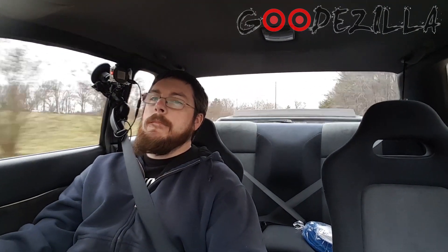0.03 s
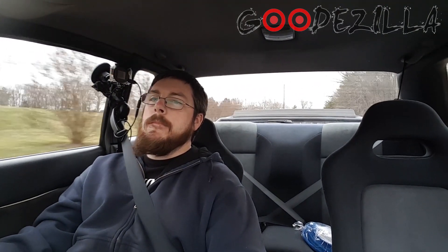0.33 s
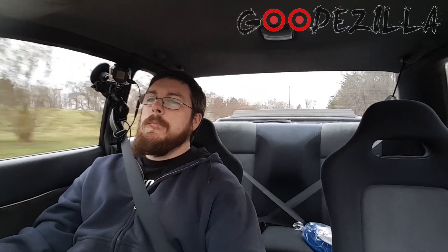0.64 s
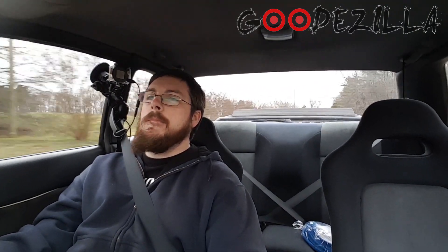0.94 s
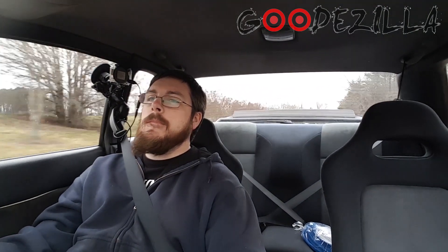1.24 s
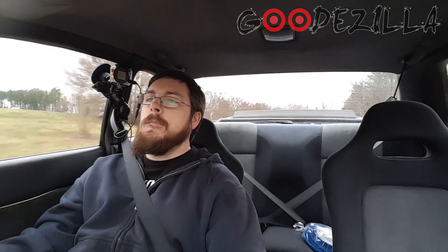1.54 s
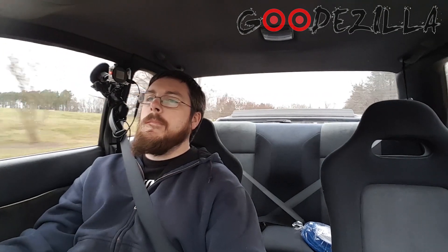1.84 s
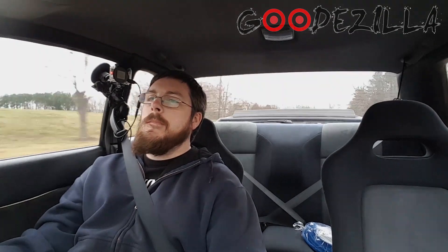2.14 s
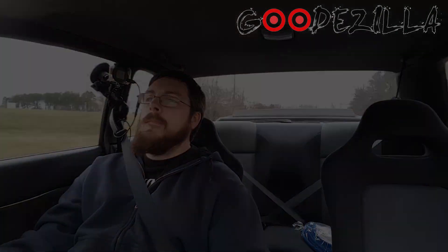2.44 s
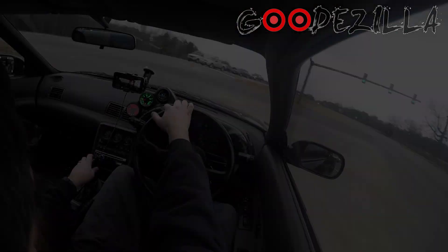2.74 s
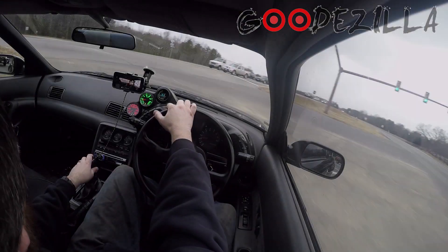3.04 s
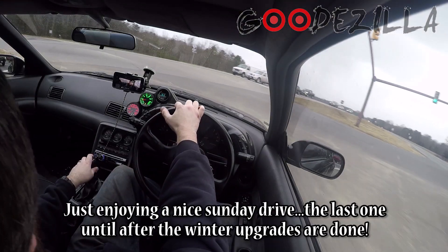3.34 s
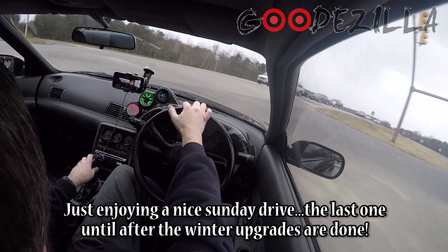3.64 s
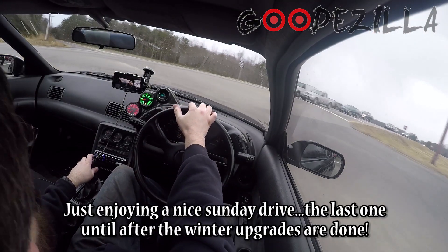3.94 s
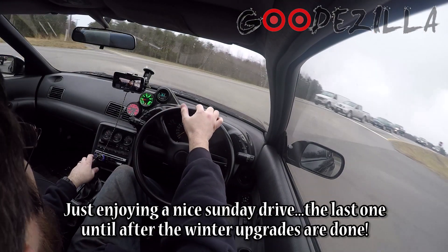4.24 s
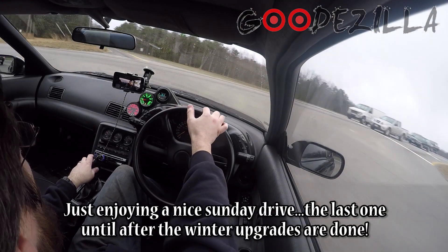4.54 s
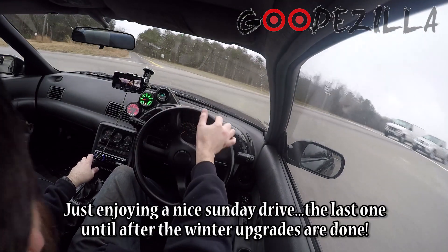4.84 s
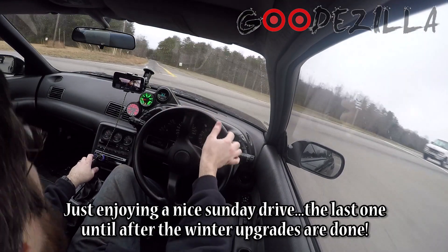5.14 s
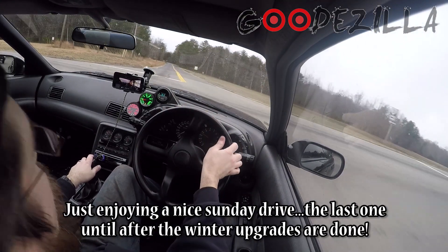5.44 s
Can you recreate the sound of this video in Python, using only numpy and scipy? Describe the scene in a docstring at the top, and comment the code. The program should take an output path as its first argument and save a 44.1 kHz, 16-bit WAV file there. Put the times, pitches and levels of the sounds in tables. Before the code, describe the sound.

Inside a sports car, a loud engine drone cuts to a quieter engine rising in pitch, with gear whine and small rattles.

```python
"""Exhaust boom of a six-cylinder sports car, heard inside: the firing rate excites cabin resonances.
First a cruise, with throbbing crank orders over road rumble, tyre roar and valve clatter.
Then a cut to a quieter seat by the driver: the car pulls away through a bend, the engine climbs in pitch,
gear meshes whine, a thin whistle rises and small bumps thud. Loose trim ticks in both scenes."""
import sys
import numpy as np
from scipy import signal
from scipy.fft import rfft, irfft, next_fast_len
from scipy.io import wavfile
from scipy.ndimage import uniform_filter1d, minimum_filter1d

SR = 44100
rng = np.random.default_rng(int(sys.argv[2]) if len(sys.argv) > 2 else 0)


def generate_wav(signal):
    """Clip the signal to [-1, 1] and save it as 16-bit WAV at the path in sys.argv[1]."""
    frames = np.transpose(np.atleast_2d(signal))
    scaled = np.clip(frames, -1, 1) * 32767
    pcm = np.round(scaled).astype(np.int16)
    wavfile.write(sys.argv[1], SR, pcm)


N = 246519
TIME_S = np.arange(N) / SR
CUT_S = 2.585
MID_FIRING_HZ = 140.0
LEFT_RIGHT = np.array([[.5], [-.5]])  # splits a left-right difference

# Firing rate, sagging in the cruise, climbing in the pull-away: t/s, f/Hz
CRUISE_FIRING = [(0.0, 157.6), (0.88, 152.8), (2.56, 143.8)]
PULL_FIRING = [(2.6, 96.5), (2.8, 101.8), (3.3, 117.9), (3.6, 126.8), (4.2, 143.2), (4.8, 159.4),
               (5.4, 174.3), (5.6, 177.5)]
# Standing waves and nulls met by the boom (left, right) and its octave: f/Hz, width/Hz, gain/dB
LEFT_MODES = [(114.3, 14, -7), (121, 4.4, 6), (129, 7, -8.5), (157, 12, -17), (172.6, 3, 2.5)]
RIGHT_MODES = [(100.6, 4.5, 2.5), (107.7, 5, -6.5), (117.5, 3, 5), (120.8, 2, -4), (124.2, 3.5, -7),
               (156.5, 7, 3), (168.5, 3.7, -7), (174.5, 11, 7)]
OCTAVE_MODES = [(196, 20, 11.5), (246, 30, -7.5), (284.5, 22.5, 4.5), (348.2, 22, 12)]
# Boom phase across the cabin: f/Hz, left lead/rad
BOOM_PHASE = [(97, 4.74), (103, 3.4), (108, 1.5), (114, 1.3), (118.5, 4), (125, 1.6), (133, 2.7),
              (145, 2.36), (152, 1.28), (160, 3.3), (170, 4.0)]
# Crank orders, firing = 3: order, level/dB
CRUISE_CRANK_ORDERS = [(1, -27.5), (1.5, -30.5), (2, -31), (2.5, -25.5), (3.5, -33.5), (4, -32),
                       (4.5, -36.5), (5, -36.5), (6, -33.5), (7, -47.5), (9, -45.5), (13, -46)]
# Crank orders: order, level/dB at low, middle, high revs
PULL_CRANK_ORDERS = [(1, -56, -44.5, -41), (2, -39, -40, -47.5), (2.5, -51, -43, -40.5),
                     (3.5, -54, -41, -35.5), (4.5, -51, -46, -30.5), (5, -38.5, -39.5, -49),
                     (6.5, -43, -41.5, -39.5), (7.5, -47, -43, -48.5), (9, -44, -43.5, -45.5),
                     (10.5, -57, -57.5, -40.5), (12, -51, -52, -42.5)]
# Gear meshes: tooth contacts per shaft turn
MESH_TEETH = (10, 20, 24, 48)
# Same meshes: relative level/dB at MID_FIRING_HZ, slope/(dB/octave)
MESH_GAINS = [(-49, -0.5), (-56, -7), (-59.5, 1.5), (-66, 6)]
# Dashboard and tunnel resonances: f/Hz, width/Hz, gain/dB
GEAR_MODES = [(428, 43, 7.5), (531, 55, 17), (610, 35, 12), (950, 95, 11), (1160, 85, 10.5), (1280, 40, 7),
              (1768, 34, 12), (2358, 85, 17)]
# Quiet mesh and its dashboard resonance: contacts per turn, f/Hz, width/Hz, peak level/dB
DASH_MESH = (28, 953, 62, -46)
# Whistle: t/s, f/Hz, level/dB
WHISTLE_TRACK = [(2.6, 1542, -72), (3.6, 1850, -81.5), (4.15, 2130, -71), (4.3, 2168, -55.5),
                 (4.55, 2250, -64), (4.88, 2364, -46), (5.02, 2403, -59), (5.25, 2447, -57.5),
                 (5.6, 2620, -49.5)]
# Body rumble from the uneven road: t/s, relative level/dB
CRUISE_ROAD = [(0.03, -27), (0.35, -19), (0.58, -22), (0.75, -28), (1.05, -17), (1.35, -22), (1.75, -27),
               (2.05, -24.5), (2.5, -23)]
PULL_ROAD = [(2.65, -44), (3.28, -36.5), (3.77, -35), (3.82, -36), (5.5, -35)]
# Cabin noise spectrum: f/Hz, relative density/dB, side-mid/dB
CRUISE_SPECTRUM = [(20.5, -49, -24.5), (46.5, -44, -19.5), (100, -45.5, -14), (228, -47, -22),
                   (389, -55.5, -7), (603, -64, -4.5), (700, -59, -1.5), (1126, -68.5, 5),
                   (1610, -72.5, -2), (2940, -83, 0.5), (3850, -92.5, 0), (6200, -99, 1),
                   (10100, -106, -2.5), (15000, -115, 3.5)]
PULL_SPECTRUM = [(19, -50.5, -4.5), (27.2, -41.5, -11.5), (40.2, -54, -2.5), (90, -49, 4.5),
                 (192, -48.5, 7), (365, -61.5, 0.5), (620, -65, -1.5), (870, -75, -7), (1370, -81.5, 1.5),
                 (2020, -85.5, -8), (2930, -87.5, -8), (5330, -101, 0.5), (10900, -106, 2),
                 (15000, -122, -2.5)]
# Panel resonances and cabin nulls: f/Hz, width/Hz, gain/dB
CRUISE_PANEL_MODES = [(219.5, 6, 8), (272, 26, -5), (632, 38, 4), (1480, 92, 1), (2840, 300, 5),
                      (4800, 400, 4.5), (5900, 610, 2.5), (8100, 700, 1.5)]
PULL_PANEL_MODES = [(624.5, 43, 7.4), (933, 48, 13.8), (2385, 42, 4)]
# Road bumps; trim snaps and creaks: t/s, level/dB, left-right/dB, T60/s
BUMP_EVENTS = [(3.12, -32, 0, 0.31), (3.59, -48, 5, .3), (4.65, -32, -9, 0.25), (5.06, -23, -15.5, 0.26),
               (5.31, -31, 6, 0.38)]
TICK_EVENTS = [(0.096, -42, 2, 0.035), (0.8305, -44.5, 2.5, 0.041), (2.7227, -49.5, 6, 0.065),
               (2.758, -48.5, 5, 0.053), (2.8924, -51.5, 2, 0.19), (3.0757, -44, 7, 0.033),
               (3.1508, -48.5, 5, 0.033), (3.3293, -51, -3, 0.13), (3.4386, -52, 3, 0.13),
               (3.653, -46, 5, 0.036), (3.7916, -46.5, 5, 0.06), (3.843, -34, 5, 0.026),
               (3.9831, -47.5, 8, .035), (4.151, -51, 2, 0.17), (4.4425, -42.5, 8, 0.025),
               (4.87, -47, 3, 0.059), (5.2246, -47.5, 4, .04)]
# Bump and tick spectra: f/Hz, relative level/dB
BUMP_SPECTRUM = [(15, -17), (35, -5.5), (100, 1.5), (280, -5), (450, -18), (850, -19), (1300, -38),
                 (4000, -75.5)]
TICK_SPECTRUM = [(800, -16.5), (2300, 4.5), (3800, 4.5), (6000, -5.5), (11000, -4), (13500, -13.5),
                 (15500, -22.5)]


def cruise_boom(firing_hz, start_db=-9, fade_db_per_s=1.37):
    """Exhaust firing on a cabin resonance, slowly easing."""
    level_db = start_db - fade_db_per_s * TIME_S
    return tone(phase_rad(firing_hz), level_db, waver_db=0.24, waver_hz=8, spread_rad=0.1)


def pull_boom(firing_hz, left_db=-23.5, right_db=-19, octave_db=-39.5):
    """Exhaust firing and its octave sweep through the cabin's standing waves."""
    firing_rad = phase_rad(firing_hz)
    lead_rad, = at_hz(BOOM_PHASE, firing_hz)
    level_db = left_db + modes_db(LEFT_MODES, firing_hz), right_db + modes_db(RIGHT_MODES, firing_hz)
    boom = np.sqrt(2) * from_db(level_db) * np.sin([firing_rad + lead_rad, firing_rad])
    octave = tone(2 * firing_rad, octave_db + modes_db(OCTAVE_MODES, 2 * firing_hz),
                  waver_db=1.17, waver_hz=5, spread_rad=1.27)
    return boom + octave


def cruise_orders(crank_rad):
    """Crank harmonics; unequal cylinders add half orders that throb."""
    return sum(tone(order * crank_rad, db, waver_db=0.5, waver_hz=9, spread_rad=0.54)
               for order, db in CRUISE_CRANK_ORDERS)


def pull_orders(crank_rad, firing_hz):
    """Crank harmonics swell and fade as they sweep through cabin resonances."""
    anchors_hz = np.linspace(firing_hz.min(), firing_hz.max(), 3)
    return sum(tone(order * crank_rad, np.interp(firing_hz, anchors_hz, levels_db),
                    waver_db=0.5, waver_hz=5, spread_rad=1.53)
               for order, *levels_db in PULL_CRANK_ORDERS)


def gear_whine(firing_hz, turns_per_firing=0.3214, shudder_at_s=4.6, shudder_width_s=0.11):
    """Meshes turn with the engine and sing as they cross resonances."""
    jolt = (TIME_S - shudder_at_s) / shudder_width_s
    shudder = 1 - 0.026 * jolt * np.exp(-jolt ** 2)  # shaft surges and falls back over a bump
    shaft_hz = turns_per_firing * firing_hz * shudder
    shaft_rad = phase_rad(shaft_hz)
    revs_oct = np.log2(firing_hz / MID_FIRING_HZ)
    meshes = 0
    for teeth, (db, db_per_oct) in zip(MESH_TEETH, MESH_GAINS):
        level_db = db + db_per_oct * revs_oct + modes_db(GEAR_MODES, teeth * shaft_hz)
        meshes += tone(teeth * shaft_rad, level_db,
                       waver_db=2.9, waver_hz=12, spread_rad=0.87, rough=0.17)
    teeth, centre_hz, width_hz, peak_db = DASH_MESH
    detuning = 2 * (teeth * shaft_hz - centre_hz) / width_hz
    dash_mesh = tone(teeth * shaft_rad, peak_db, waver_db=3.0, waver_hz=14, spread_rad=0.69)
    return (from_db(-1.5) * meshes + dash_mesh / (1 + detuning ** 2)) * pan(left_db=7.6)


def whistle(octave_db=-73.5):
    """Rough rising whistle with a faint octave, probably the turbocharger."""
    pitch_hz, level_db = in_time(WHISTLE_TRACK)
    pitch_rad = phase_rad(pitch_hz)
    fundamental = tone(pitch_rad, level_db, waver_db=0.8, waver_hz=16, spread_rad=0.6, rough=0.55)
    octave = tone(2 * pitch_rad, octave_db, waver_db=3.5, waver_hz=5, spread_rad=0.6, rough=0.7)
    return (fundamental + octave) * pan(left_db=5.8)


def road_rumble(road, waver_db):
    """The uneven road shakes the body; mid and side."""
    level_db, = in_time(road)
    return rng.standard_normal((2, N)) * swell(level_db + waver_db * drift(1.7))


def tyre_roar(firing_hz, waver_db, db_per_oct=2.5):
    """Rolling noise, growing with the revs; mid and side."""
    level_db = db_per_oct * np.log2(firing_hz / MID_FIRING_HZ) + waver_db * drift(6.3)
    return rng.standard_normal((2, N)) * swell(level_db)


def engine_clatter(firing_hz, pattern_share, throb, waver_db, db_per_oct=10.5, points=1500):
    """Valves and injectors repeat every two crank turns, mixed with fresh noise; mid and side."""
    firing_rad = phase_rad(firing_hz)
    position = firing_rad / (12 * np.pi) * points % points  # six firings per cycle
    cycles = rng.standard_normal((2, points))
    pattern = unit_rms(np.array([np.interp(position, np.arange(points), c) for c in cycles]))
    clatter = np.sqrt(pattern_share) * pattern + np.sqrt(1 - pattern_share) * rng.standard_normal((2, N))
    level_db = db_per_oct * np.log2(firing_hz / MID_FIRING_HZ) + waver_db * drift(4.7)
    return clatter * (1 + throb * np.cos(firing_rad)) * swell(level_db)


def cabin_noise(rumble, roar, clatter, spectrum, panels, rumble_hz, clatter_hz, gain_db):
    """Rumble, roar and clatter fill the low, middle and high bands, coloured by the cabin."""
    size = next_fast_len(N)
    hz = np.arange(size // 2 + 1) * SR / size
    density_db, side_db = at_hz(spectrum, hz)
    side_gain = from_db(side_db)
    mid_side = np.array([np.ones_like(hz), side_gain]) / np.sqrt(1 + side_gain ** 2)
    colour = from_db(density_db + modes_db(panels, hz) + gain_db) * np.sqrt(SR / 2)
    colour /= np.sqrt(1 + (16 / (hz + 1)) ** 8)  # 16 Hz high-pass
    low = 1 / (1 + (hz / rumble_hz) ** 4)
    high = 1 - 1 / (1 + (hz / clatter_hz) ** 4)
    bands = (rumble, low), (roar, (1 - low) * (1 - high)), (clatter, high)
    mix = sum(rfft(source, size) * np.sqrt(share) for source, share in bands)
    mid, side = irfft(mix * colour * mid_side, size)[:, :N]
    return np.array([mid + side, mid - side])


def road_bumps():
    """Bumps shake the body: dull thuds."""
    return knocks(BUMP_EVENTS, BUMP_SPECTRUM, rise_s=0.015, grain_db=4.0, side_gain=0.61, size=24000)


def loose_trim(stirs=26, end_s=4.4, top_db=-52.5, range_db=9, t60_s=0.07):
    """Trim ticks; smaller bits stir at random through the bend."""
    rattle = [(CUT_S + (end_s - CUT_S) * when, top_db - range_db * softness, 8 * (side - 0.3), t60_s)
              for when, softness, side in rng.random((stirs, 3))]
    events = [*TICK_EVENTS, *rattle]
    return knocks(events, TICK_SPECTRUM, rise_s=0.00091, grain_db=1.5, side_gain=0.22, size=6000)


def knocks(events, spectrum, rise_s, grain_db, side_gain, size):
    """Dying clusters of tiny contacts, coloured by what they shake."""
    out = np.zeros((2, N + size))
    age_s = np.arange(size) / SR
    colour_db, = at_hz(spectrum, np.arange(size // 2 + 1) * SR / size)
    for onset_s, db, left_db, t60_s in events:
        grains = from_db(grain_db * rng.standard_normal(size // 40).repeat(40))
        mid, side = rng.standard_normal((2, size)) * grains
        contacts = np.array([mid + side_gain * side, mid - side_gain * side])
        burst = unit_rms(irfft(rfft(contacts) * from_db(colour_db)))
        envelope = from_db(db - 60 * age_s / t60_s) * (1 - np.exp(-age_s / rise_s))
        start = round(onset_s * SR)
        out[:, start:start + size] += burst * envelope * pan(left_db)
    return out[:, :N]


def tone(rad, db, waver_db, waver_hz, spread_rad, rough=0):
    """Wavering partial, phase-shifted between the sides; rough jitters phase and level."""
    lead_rad = spread_rad * (rng.choice([-1, 1]) + drift(5.4) / 2)
    level = from_db(db + waver_db * drift(waver_hz))
    if rough:
        rad = rad + rough * drift(23)
        level = level * (1 + rough * drift(50) / 2)
    return np.sqrt(2) * level * np.sin(rad + rng.uniform(0, 2 * np.pi) + lead_rad * LEFT_RIGHT)


def drift(corner_hz, hop=40, settle=2000):
    """Slow low-passed noise, unit RMS."""
    pole = np.exp(-2 * np.pi * corner_hz * hop / SR)
    noise = rng.standard_normal(N // hop + settle + 2)
    slow = signal.lfilter([1], [1, -2 * pole, pole * pole], noise)[settle:]
    return np.interp(np.arange(N) / hop, np.arange(len(slow)), unit_rms(slow))


def modes_db(modes, hz):
    """Summed gain of resonance peaks and nulls."""
    return sum(db / (1 + (2 * (hz - centre_hz) / width_hz) ** 2) for centre_hz, width_hz, db in modes)


def in_time(rows):
    """Table columns at every sample."""
    times_s, *columns = np.transpose(rows)
    return [np.interp(TIME_S, times_s, column) for column in columns]


def at_hz(rows, hz):
    """Table columns interpolated over log frequency."""
    points_hz, *columns = np.transpose(rows)
    return [np.interp(np.log(hz + 1), np.log(points_hz), column) for column in columns]


def phase_rad(hz):
    return 2 * np.pi * np.cumsum(hz) / SR


def from_db(db):
    return 10 ** (np.asarray(db) / 20)


def swell(db):
    return from_db(db - db.mean())


def pan(left_db):
    return from_db(left_db * LEFT_RIGHT)


def unit_rms(x):
    return x / np.sqrt(np.mean(x ** 2) + 1e-20)


def cruising():
    """Revs sag slowly; boom over cabin noise."""
    firing_hz, = in_time(CRUISE_FIRING)
    engine = cruise_boom(firing_hz) + cruise_orders(phase_rad(firing_hz) / 3)
    rumble = road_rumble(CRUISE_ROAD, waver_db=0)
    roar = tyre_roar(firing_hz, waver_db=1.6)
    clatter = engine_clatter(firing_hz, pattern_share=0.3, throb=0.09, waver_db=0.46)
    noise = cabin_noise(rumble, roar, clatter, CRUISE_SPECTRUM, CRUISE_PANEL_MODES,
                        rumble_hz=100, clatter_hz=1020, gain_db=0.6)
    return (engine + noise) * pan(left_db=-0.85)


def pulling_away():
    """Revs climb; gear whine and whistle join."""
    firing_hz, = in_time(PULL_FIRING)
    engine = pull_boom(firing_hz) + pull_orders(phase_rad(firing_hz) / 3, firing_hz)
    rumble = road_rumble(PULL_ROAD, waver_db=3.6)
    roar = tyre_roar(firing_hz, waver_db=0.6)
    clatter = engine_clatter(firing_hz, pattern_share=0.14, throb=0.052, waver_db=0.5)
    noise = cabin_noise(rumble, roar, clatter, PULL_SPECTRUM, PULL_PANEL_MODES,
                        rumble_hz=86.5, clatter_hz=1070, gain_db=-3.0)
    return engine + gear_whine(firing_hz) + whistle() + noise


def scene(crossfade_s=0.001, click_db=-24.0):
    """Two stretches of driving, joined by an abrupt cut with a faint click."""
    after_cut = np.clip((TIME_S - CUT_S) / crossfade_s + 0.5, 0, 1)
    drive = (1 - after_cut) * cruising() + after_cut * pulling_away()
    click = from_db(click_db) * (np.arange(N) == round(CUT_S * SR))
    return drive + road_bumps() + loose_trim() + click


def record(dry, ceiling_db=-2.6, window_samples=600, fade_s=0.004, cutoff_hz=15700):
    """Fast limiter on the boom's peaks, end fades, steep low-pass."""
    allowed = np.minimum(1, from_db(ceiling_db) / (np.abs(dry).max(axis=0) + 1e-9))
    gain = uniform_filter1d(minimum_filter1d(allowed, window_samples), window_samples)
    fades = np.minimum(np.minimum(TIME_S, TIME_S[::-1]) / fade_s, 1)
    lowpass = signal.ellip(10, 0.1, 80, cutoff_hz, fs=SR, output="sos")
    return signal.sosfilt(lowpass, dry * gain * fades)


dry = scene()
out = record(dry)
generate_wav(out)
```